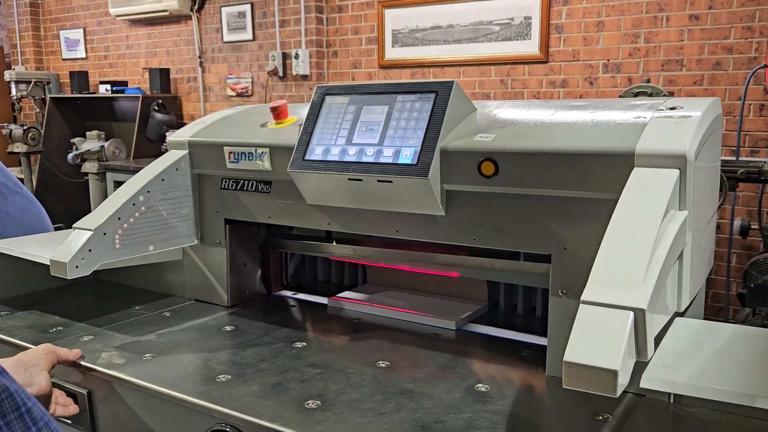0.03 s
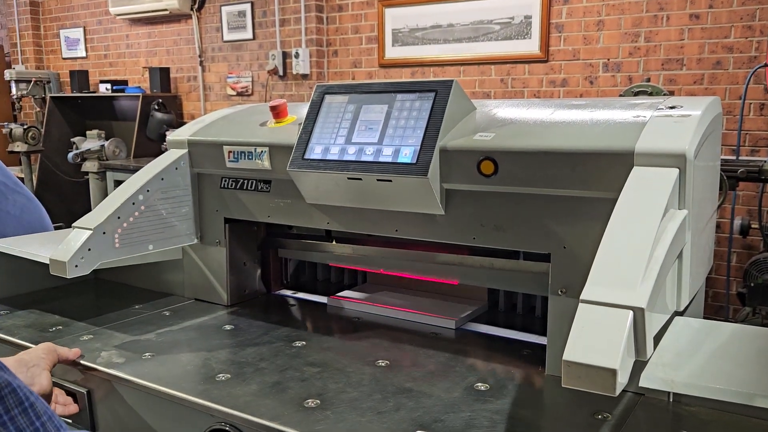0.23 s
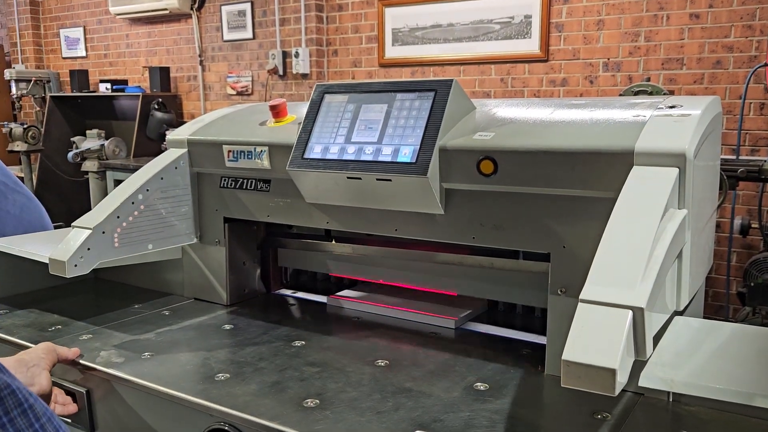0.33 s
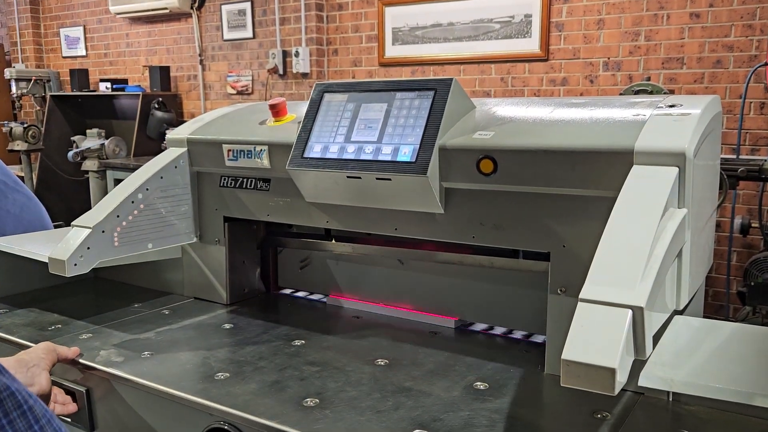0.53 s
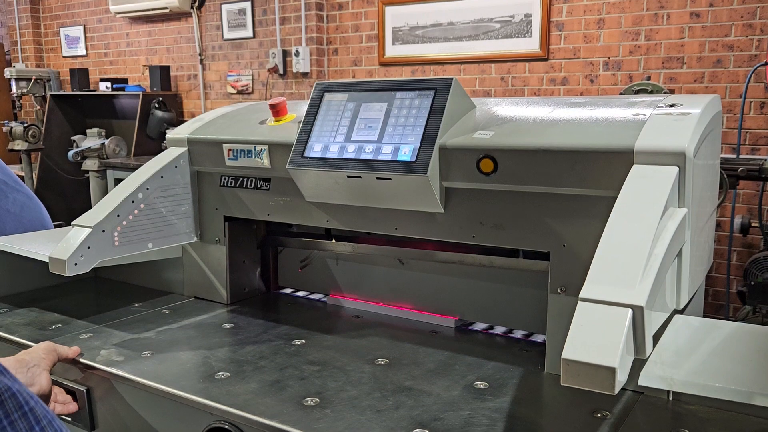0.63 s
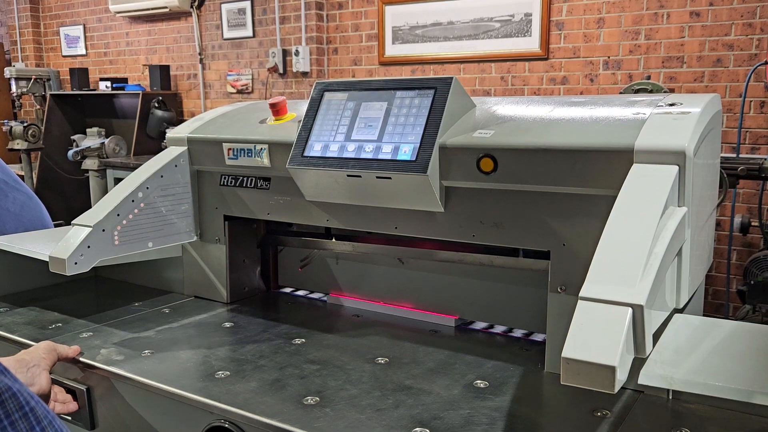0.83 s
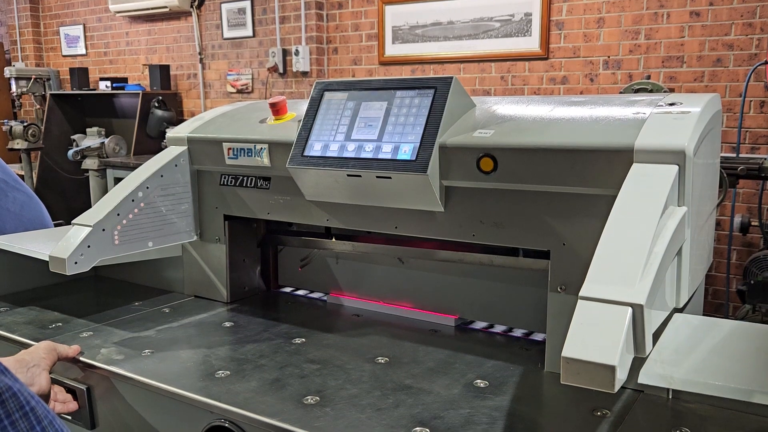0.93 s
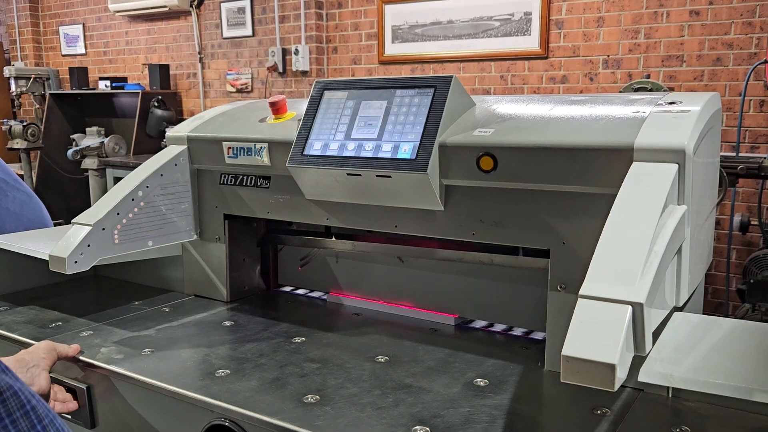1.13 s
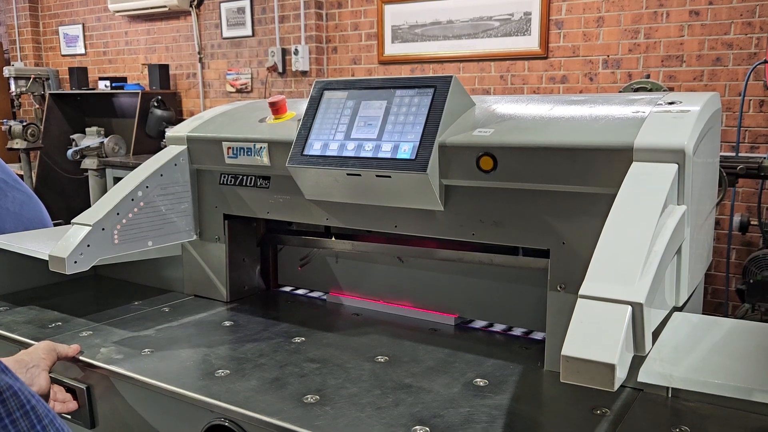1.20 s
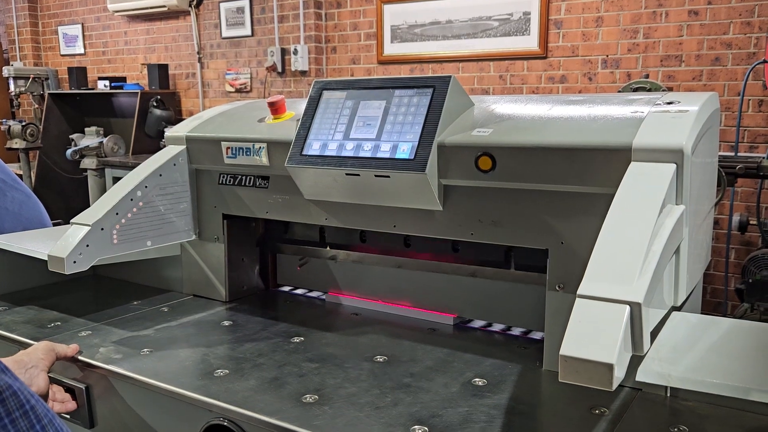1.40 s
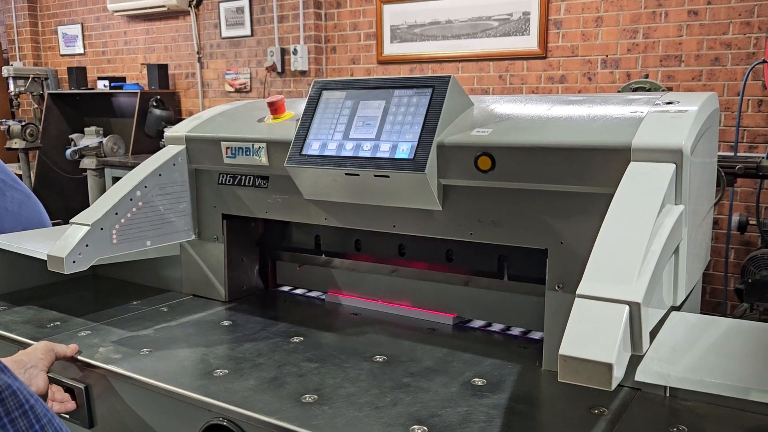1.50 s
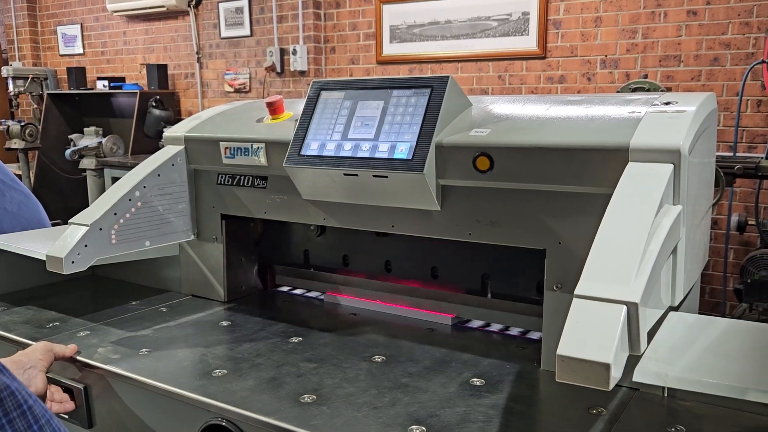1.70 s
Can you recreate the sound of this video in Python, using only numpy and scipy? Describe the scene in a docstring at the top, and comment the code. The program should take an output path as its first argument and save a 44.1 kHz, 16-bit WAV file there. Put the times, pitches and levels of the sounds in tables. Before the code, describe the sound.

A paper guillotine starts with a tick and a sharp snap, then clunks several times, its steel frame ringing. The motor hums and oil hisses until a valve knocks and the pump whines on in a quiet workshop.

```python
"""In a brick workshop, at the operator's place, a hydraulic paper guillotine makes one cut.
A button ticks, a contactor snaps in, the motor starts and the clamp comes down in heavy clunks,
each an impact that sets the steel frame ringing in its normal modes. Magnetic forces make the motor
hum and oil hisses through the valves under load; then the valve shifts with a clunk and the pump
whines on, at harmonics of its pulse rate, as the blade rises."""
import sys
import numpy as np
from scipy import signal
from scipy.fft import irfft
from scipy.io import wavfile
from scipy.ndimage import uniform_filter1d

SR = 44100
rng = np.random.default_rng(int(sys.argv[2]) if len(sys.argv) > 2 else 0)


def to_wav(s):
    """Save 16-bit WAV."""
    ch = np.atleast_2d(s).T  # columns
    pcm = np.round(np.clip(ch, -1, 1) * 32767)  # PCM
    wavfile.write(sys.argv[1], SR, pcm.astype(np.int16))


N = 77175
TIME = np.arange(N) / SR


def undb(db):
    """The decibel scale: 20 dB is a factor of ten in amplitude."""
    return 10 ** (np.asarray(db) / 20)

def curve(rows, column=1):
    """Linear interpolation of one column of a table over time."""
    rows = np.array(rows)
    return np.interp(TIME, rows[:, 0], rows[:, column])

def at_pitch(points, hz):
    """Linear interpolation of a table over log frequency."""
    points = np.array(points)
    return np.interp(np.log(hz + 1), np.log(points[:, 0]), points[:, 1])

def wander(rate_hz):
    """Smoothed Gaussian noise: a random fluctuation with a spread near 1."""
    hold = int(SR / rate_hz)
    return uniform_filter1d(rng.standard_normal(N)[np.arange(N) // hold], hold)

def fade(start, rise, t60):
    """Exponential damping: after a linear rise, the level falls 60 dB in t60 seconds."""
    age = TIME - start
    return np.clip(age / rise, 0, 1) * np.exp(-np.log(1000) * np.maximum(age - rise, 0) / t60)

def aside(db):
    """A level difference, left minus right, places a sound to one side."""
    return undb(np.array([[1], [-1]]) * db / 2)

# Likeness of the channels. Each row: frequency in Hz, correlation (capped at 1 in use).
CORRELATION = [(60, 1.24), (250, 1.01), (700, 0.75), (1400, 0.35), (2800, 0.1), (5500, -0.02),
               (12000, 0.02)]
# Balance of the channels. Each row: frequency in Hz, left minus right in dB.
BALANCE = [(150, 1.5), (1400, -0.5), (3300, 0), (5000, -9.5), (6500, 2), (8800, 3.5), (11800, -5.5),
           (14000, -1.5)]

def spread(mid, side, hz):
    """Spatial coherence: left and right are alike in the bass and diffuse in the treble."""
    alike = np.clip(at_pitch(CORRELATION, hz), -1, 1)
    common = np.sqrt((1 + alike) / 2) * mid
    opposed = np.array([[1], [-1]]) * np.sqrt((1 - alike) / 2) * side
    return (common + opposed) * aside(at_pitch(BALANCE, hz))

def noise(spectrum, low_hz=0, high_hz=SR, ripple_db=3.2):
    """Random-phase noise of rms 1, its spectrum rippled by small resonances of panels and walls."""
    hz = np.arange(N // 2 + 1) * SR / N + 1
    band = 1 / np.sqrt((1 + (low_hz / hz) ** 10) * (1 + (hz / high_hz) ** 10))
    mid, side = np.exp(2j * np.pi * rng.random((2, len(hz))))
    centres_hz = np.arange(0, SR / 2, 45)
    ripple = np.interp(hz, centres_hz, rng.standard_normal(len(centres_hz)))
    depth_db = ripple_db * np.minimum(hz / 1500, 1)
    wave = irfft(spread(mid, side, hz) * band * undb(depth_db * ripple + at_pitch(spectrum, hz)), N)
    return wave / wave.std()

def ring(start, hz, rise, t60):
    """Free vibration of one mode: a damped sinusoid, slightly detuned at every blow."""
    phase = 2 * np.pi * hz * (1 + 0.0015 * rng.standard_normal()) * (TIME - start)
    return spread(np.sin(phase), np.cos(phase), hz) * fade(start, rise, t60)


# Air of the workshop. Each row: frequency in Hz, relative spectral density in dB.
AIR_SPECTRUM = [(30, -13), (100, -7), (190, 1.5), (300, -9.5), (470, -19.5), (750, -19), (1050, -32),
                (1300, -23.5), (2600, -26), (4500, -21), (7000, -29.5), (16000, -46)]

def workshop_air():
    """Stationary noise forms the quiet floor of the room."""
    return undb(-45) * noise(AIR_SPECTRUM)

# Oil jets. Each row: start and end in seconds, first pitch, last pitch and bandwidth in Hz,
# level in dB, left minus right in dB.
OIL_JETS = [(1.19, 1.287, 1800, 2015, 503, -39.5, -6), (1.17, 1.3, 4950, 5150, 600, -48, -4.5),
            (1.57, 1.93, 6100, 6850, 480, -50, 2)]

def oil_jets():
    """Oil squeezed through a narrowing valve radiates narrow-band noise that rises in pitch."""
    out, edge_s = 0, 0.038
    for start, end, first_hz, last_hz, width_hz, db, pan in OIL_JETS:
        phase = 2 * np.pi * np.cumsum(np.interp(TIME, [start, end], [first_hz, last_hz])) / SR
        mid, side = (wander(width_hz) * np.sin(phase) + wander(width_hz) * np.cos(phase)
                     for _ in range(2))
        opening = np.clip(np.minimum(TIME - start, end - TIME) / edge_s, 0, 1)
        out += undb(db) * opening * aside(pan) * spread(mid, side, first_hz)
    return out

# Course of the oil's hiss. Each row: time in seconds, level in dB.
HISS_LEVEL = [(.2, -86), (.3, -30.5), (.49, -36.5), (.565, -44.5), (.64, -37.5), (.85, -41), (1.16, -38.5),
              (1.33, -37.5), (1.42, -45.5), (1.62, -48), (1.67, -45.5), (1.75, -46.5)]
# Its colour. Each row: frequency in Hz, relative spectral density in dB.
HISS_SPECTRUM = [(900, -3), (1800, -1.5), (2400, -2.5), (3000, -11), (4200, -9), (4850, 0.5), (5300, -2),
                 (5900, -5), (8500, -7), (9700, -14), (11300, -10), (12800, -11.5), (16000, -25)]

def oil_hiss():
    """Flow noise: oil forced through the valves gives a broadband hiss."""
    return undb(curve(HISS_LEVEL) + 0.84 * wander(60.7)) * noise(HISS_SPECTRUM, ripple_db=1.6)

# Course of the pump. Each row: time in seconds, pulse rate in Hz, level in dB.
PUMP_RUN = [(.28, 279.1, -68), (.45, 294.9, -54), (.75, 286.6, -45.5), (1.0, 291, -48.5), (1.3, 289.8, -46),
            (1.5, 293, -47), (1.6, 294.6, -45.5), (1.75, 289, -49)]
# Its harmonics. Each row: harmonic number, relative levels in dB under load and running free.
PUMP_HARMONICS = [(1, -27, 12), (2, -0.5, 4.5), (3, -10, -2.5), (4, -9, -29), (5, -12, -16)]

def pump():
    """Periodic pulses give a harmonic whine, whose timbre changes as the load comes off."""
    phase = 2 * np.pi * np.cumsum(curve(PUMP_RUN) * (1 + 0.00302 * wander(29.13))) / SR
    whine, unload_s, flutter_db = 0, 1.4, 1.8
    free = np.clip((TIME - unload_s) / 0.088, 0, 1)
    for k, loaded_db, free_db in PUMP_HARMONICS:
        db = loaded_db + free * (free_db - loaded_db) + flutter_db * wander(70)
        whine += undb(db) * np.sin(k * phase)
    return np.sqrt(2) * undb(curve(PUMP_RUN, column=2)) * whine

# Courses of the drive's rumble and the shaken panels. Each row: time in seconds, level in dB.
RUMBLE_LEVEL = [(.25, -70), (.32, -32), (.55, -48), (.72, -31.5), (.9, -32.5), (1.1, -38.5), (1.27, -38),
                (1.45, -49), (1.75, -38)]
PANEL_LEVEL = [(.25, -64), (.35, -31), (.72, -34.5), (.95, -38.5), (1.2, -40.5), (1.5, -30.5), (1.62, -39),
               (1.75, -37.5)]
# Their colours. Each row: frequency in Hz, relative spectral density in dB.
RUMBLE_SPECTRUM = [(25, -20), (40, 0), (52, 3), (70, 4), (90, 7.5), (130, -2.5), (220, -32.5)]
PANEL_SPECTRUM = [(90, -37), (165, -3), (225, -2), (340, -6.5), (480, -14.5), (650, -11), (820, -15),
                  (1100, -20), (2000, -28.5), (4000, -58)]

def drive():
    """Forced vibration: the drive rumbles and shakes the panels."""
    rumble = undb(curve(RUMBLE_LEVEL)) * noise(RUMBLE_SPECTRUM)
    return rumble + undb(curve(PANEL_LEVEL)) * noise(PANEL_SPECTRUM)

# Course of the motor's hum. Each row: time in seconds, level in dB.
HUM_LEVEL = [(.26, -75), (.3, -24.5), (.55, -37.5), (.76, -29.5), (.81, -22.5), (.85, -30), (.9, -29),
             (1.0, -26), (1.29, -27), (1.42, -34), (1.5, -48), (1.59, -27.5), (1.64, -59), (1.69, -30.5),
             (1.75, -31.5)]
# Its harmonics. Each row: harmonic number, relative level in dB.
HUM_HARMONICS = [(1, 0.5), (2, -13), (3, -36)]

def motor(hum_hz=99.5):
    """Magnetic force peaks twice a cycle, so the motor hums near twice the 50 Hz mains frequency."""
    phase = 2 * np.pi * np.cumsum(hum_hz * (1 + 0.0045 * wander(14.4))) / SR
    hum = sum(undb(db + 0.3 * wander(27)) * np.sin(k * phase) for k, db in HUM_HARMONICS)
    return np.sqrt(2) * undb(curve(HUM_LEVEL)) * hum

# Modes of the button with its panel, and of the contactor. Each row: frequency in Hz, level in dB,
# t60 in seconds, left minus right in dB.
BUTTON_RESONANCES = [(193.5, -35.5, 1, -1), (237.4, -35.5, 0.76, 1), (442, -43, 0.27, 0),
                     (986, -32, 0.035, 1), (5920, -29, 0.034, -6), (8600, -36.5, 0.043, 8),
                     (12900, -33, .05, 0)]
CONTACTOR_RESONANCES = [(300, -27, 0.11, 1), (339.1, -18.5, 1, 2), (618, -34, 0.52, 6),
                        (1547, -26.5, 0.091, 0), (1960, -21.5, 0.11, -3), (3730, -27.5, 0.32, 6),
                        (5300, -26, 0.087, -4), (9000, -37, 0.2, 9), (11820, -9, 0.036, -1.5),
                        (12050, -28, 0.28, 2)]
# Contactor clicks. Each row: start in seconds, levels of snap, housing knock and metal ring in dB,
# t60 of the snap in seconds.
CONTACTOR_CLICKS = [(.194, -14.5, -30.5, -32, 0.085), (.203, -24, -19.5, -1, 0.054)]
# Colours of snap and knock. Each row: frequency in Hz, relative spectral density in dB.
SNAP_SPECTRUM = [(300, 0.5), (1000, -4), (2700, -1), (4300, 2.5), (5800, 3), (7200, -4), (8700, 3),
                 (9900, -9), (11300, -2.5), (12600, -1), (16000, -6.5)]
KNOCK_SPECTRUM = [(60, -27), (215, -17), (305, 4.5), (480, -12), (900, -17), (2000, -20.5), (6000, -47)]

def switches(button_s=0.136, button_db=-26.5, tail_db=-13.5, tail_t60=0.41):
    """Brief impacts have broad spectra: button and contactor snap, then ring in their modes."""
    snap, knock = noise(SNAP_SPECTRUM), noise(KNOCK_SPECTRUM)
    button_tail = undb(tail_db) * fade(button_s, 0.0088, tail_t60)
    out = undb(button_db) * snap * (fade(button_s, 0.00042, 0.024) + button_tail)
    for hz, db, t60, pan in BUTTON_RESONANCES:
        out += undb(db) * aside(pan) * ring(button_s, hz, 0.0019, t60)
    for start, snap_db, knock_db, ring_db, snap_t60 in CONTACTOR_CLICKS:
        tail = undb(tail_db) * fade(start, 0.0045, tail_t60)
        out += undb(snap_db) * snap * np.hypot(fade(start, 0.00065, snap_t60), tail)
        out += undb(knock_db) * knock * fade(start, 0.0038, t60=0.49)
        for hz, db, t60, pan in CONTACTOR_RESONANCES:
            out += undb(ring_db + db) * aside(pan) * ring(start, hz, 0.0035, t60)
    return out

# Modes of the valve block. Each row: frequency in Hz, level in dB, t60 in seconds.
VALVE_RESONANCES = [(585, -23, 0.13), (662, -25, 0.18), (771, -35, 0.16), (1560, -34, 0.33)]

def valve_block(shift_s=1.354):
    """Impulse excitation: the block rings as the valve shifts."""
    return sum(undb(db) * ring(shift_s, hz, 0.0035, t60) for hz, db, t60 in VALVE_RESONANCES)

# Booms of the cabinet. Each row: start in seconds, frequency in Hz, level in dB, t60 in seconds.
CABINET_BOOMS = [(.358, 188, -9.5, 0.2), (0.415, 109.8, -16, 0.15), (.642, 65, -23, 0.65),
                 (1.358, 114, -22.5, 0.3)]

def cabinet():
    """Transient response: the cabinet booms in its low modes as it takes the load."""
    return sum(undb(db) * ring(start, hz, 0.0098, t60) for start, hz, db, t60 in CABINET_BOOMS)

# The clamp landing and the blade breaking through. Each row: start in seconds, level in dB,
# pitch factor.
STEEL_CRACKS = [(.2755, -5.5, 0.99), (.3577, -6, 1.205), (.5912, -4, 1.017), (.5963, -15, 0.873)]
# Modes of the contact. Each row: base frequency in Hz, relative level in dB, t60 in seconds.
CRACK_RESONANCES = [(813, -5, 0.019), (1515, -1, 0.016), (1950, -11, 0.011), (4190, -12, 0.013)]

def steel_cracks():
    """Steel striking steel excites heavily damped modes, heard as cracks straight ahead."""
    out = 0
    for start, db, pitch in STEEL_CRACKS:
        for hz, mode_db, t60 in CRACK_RESONANCES:
            tone = np.sin(2 * np.pi * hz * pitch * (TIME - start))
            out += undb(db + mode_db) * tone * fade(start, 0.00048, t60)
    return out

# Blows of clamp, blade and valve. Each row: start, base rise and base t60 in seconds, then levels
# in dB of six bands (thud, body, knock, clang, clank, tick) and of the frame's ring.
IMPACTS = [(0.248, 0.0079, 0.15, -40, -27, -21.5, -45, -26.5, -30, -23),
           (0.2746, 0.0045, 0.069, -26, -15, -12.5, -16, -18.5, -22.5, -8),
           (.310, 0.0085, 0.15, -25, -36, -19, -19, -35, -34, -22),
           (.357, 0.0018, 0.11, -24.5, -17, -13.5, -18, -18, -27, -17),
           (.412, 0.0051, 0.23, -37, -18.5, -25, -49, -60, -56, -27),
           (0.477, 0.0085, 0.066, -40, -40, -34, -34, -33, -38, -38),
           (.592, 0.0011, 0.086, -25, -16, -17.5, -24.5, -22.5, -23.5, -22.5),
           (1.289, .003, .09, -33, -23, -28, -41, -50, -50, -36),
           (1.352, 0.0043, 0.13, -25, -17.5, -21.5, -28.5, -28.5, -36.5, -57),
           (1.405, 0.0026, 0.16, -29, -23.5, -30.5, -33.5, -40, -59, -33)]
# The six bands. Each row: lower and upper edge in Hz, relative level of the tail in dB, its t60 in
# seconds, factor that stretches the blow's rise and t60.
IMPACT_BANDS = [(47.4, 106, -4.5, 1.47, 4.3), (145, 427, -7.5, 0.89, 2), (472, 963, -9, 0.36, 1.2),
                (1010, 3600, -10.5, 0.53, 1), (2290, 7900, -10.5, 0.75, 1.34),
                (7800, 15600, -22, 0.21, 0.77)]
# Colour of a blow. Each row: frequency in Hz, relative spectral density in dB.
IMPACT_SPECTRUM = [(18, -50), (30, -30), (79, -22), (199, -0.5), (287, -6.5), (415, -9), (526, -18),
                   (889, -13.5), (1070, -18), (1460, -11), (1590, -14), (2230, -20.5), (2680, -28),
                   (3310, -28), (3980, -30.5), (4910, -27), (6550, -39), (8740, -40), (9970, -57.5),
                   (12300, -40), (16000, -52)]
# Modes of the steel frame. Each row: frequency in Hz, relative level in dB, t60 in seconds.
FRAME_RESONANCES = [(175, -4, 0.45), (185, -9, 0.49), (222.2, -7.5, 0.94), (371, -13.5, 0.43),
                    (405.2, -6.5, 0.267), (685, -19, .4), (832, -16, 0.32), (898, -19, 0.39),
                    (1283, -16.5, 0.43), (1340, -22, 0.28), (1451, -15, 0.32), (1520, -8, 0.2),
                    (2220, -16.5, 0.37)]

def blows():
    """Modal overlap: the struck panels' dense modes merge into noise; the frame's ring as tones."""
    out = 0
    for band, (low_hz, high_hz, tail_db, tail_t60, stretch) in enumerate(IMPACT_BANDS):
        power = 0  # incoherent sounds add in power
        for start, rise, t60, *levels_db in IMPACTS:
            direct = fade(start, rise * stretch, t60 * stretch)
            room_tail = undb(tail_db) * fade(start, 0.013, tail_t60)
            power += undb(levels_db[band]) ** 2 * (direct ** 2 + room_tail ** 2)
        out += np.sqrt(power) * noise(IMPACT_SPECTRUM, low_hz, high_hz)
    for start, rise, *_, ring_db in IMPACTS:
        out += sum(undb(ring_db + db) * ring(start, hz, rise, t60) for hz, db, t60 in FRAME_RESONANCES)
    return out


def scene():
    """Superposition: the sounds of the machine add to the quiet air of the workshop."""
    strikes = switches() + blows() + cabinet() + steel_cracks() + valve_block()
    return strikes + motor() + drive() + pump() + oil_hiss() + oil_jets() + workshop_air()

def record(dry, cutoff_hz=15900):
    """Soft saturation rounds the highest peaks; a low-pass filter removes the top of the treble."""
    rounded = dry / (1 + dry ** 6) ** (1 / 6)
    return signal.sosfilt(signal.ellip(10, .2, 80, cutoff_hz, fs=SR, output="sos"), rounded)


dry = scene()
out = record(dry)
to_wav(out)
```